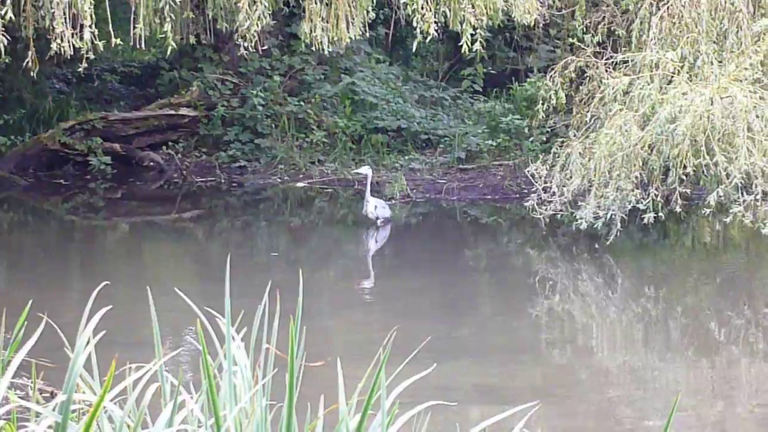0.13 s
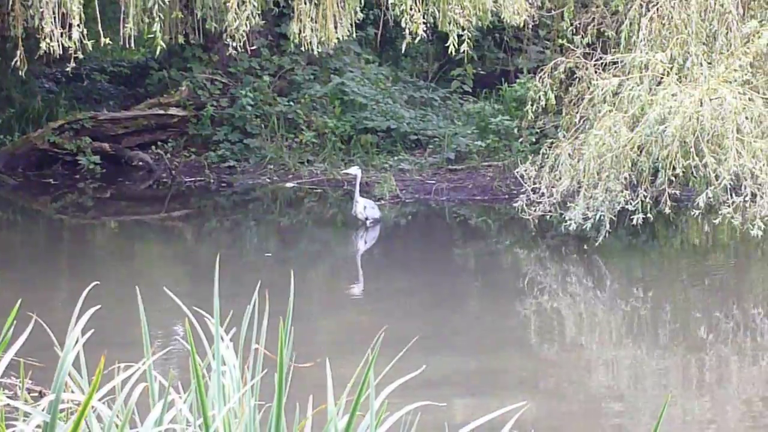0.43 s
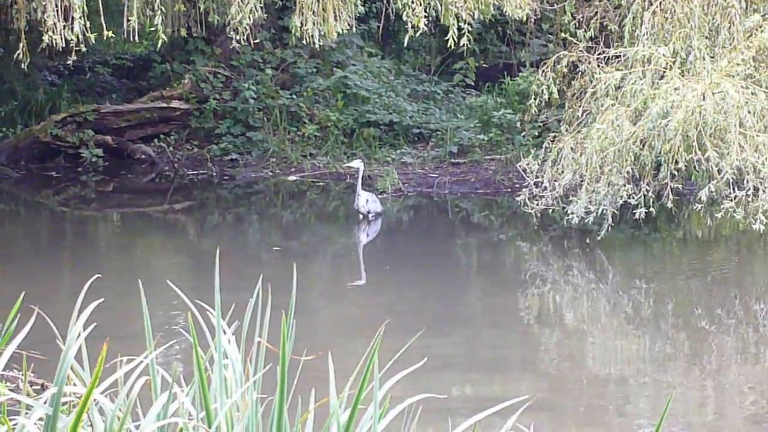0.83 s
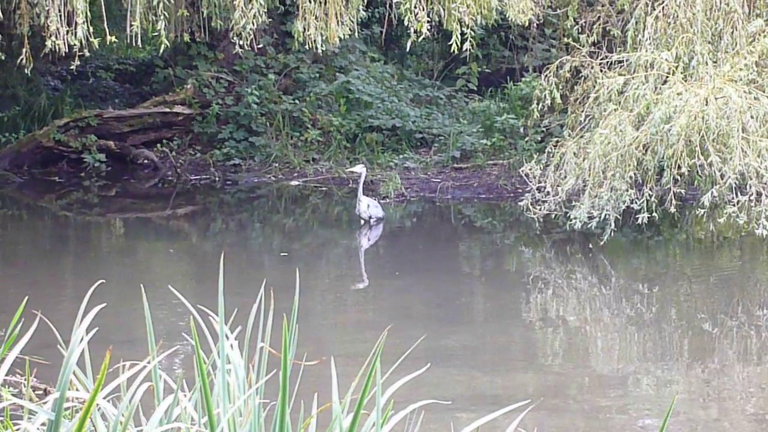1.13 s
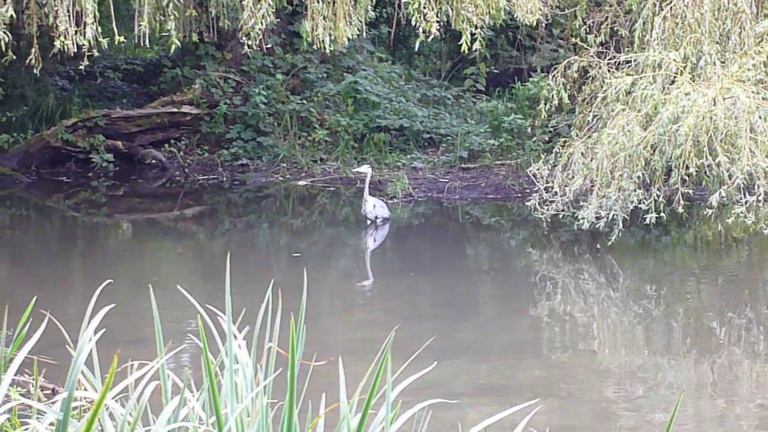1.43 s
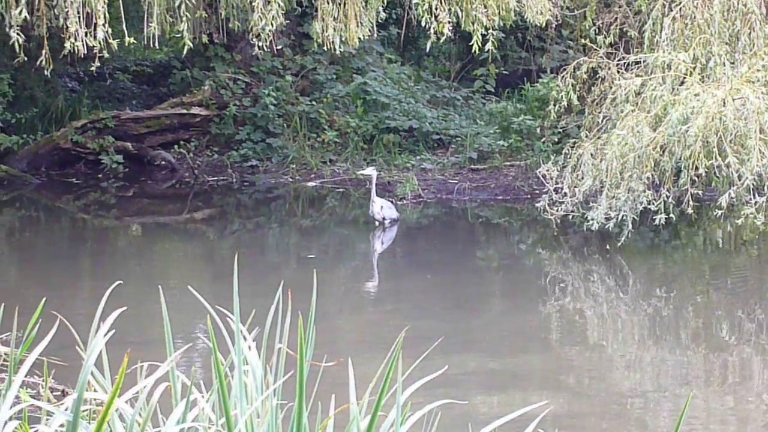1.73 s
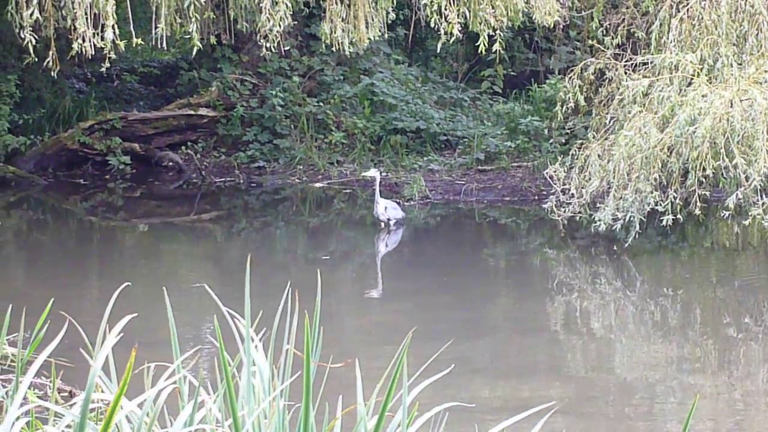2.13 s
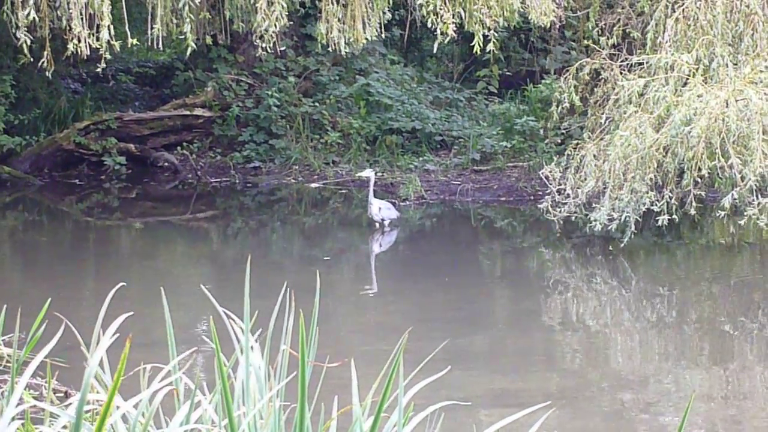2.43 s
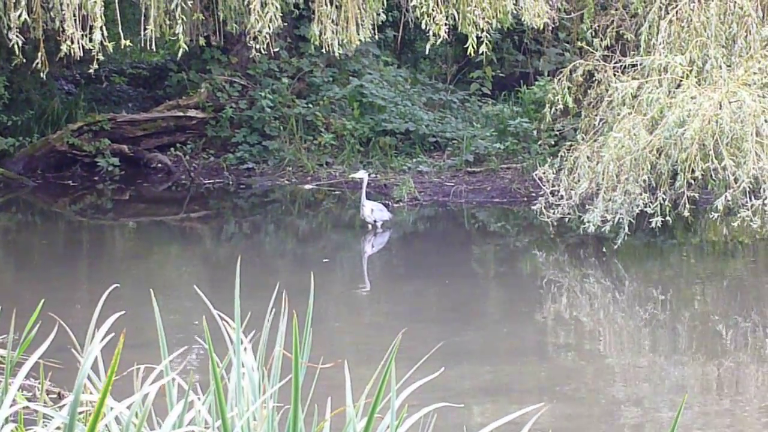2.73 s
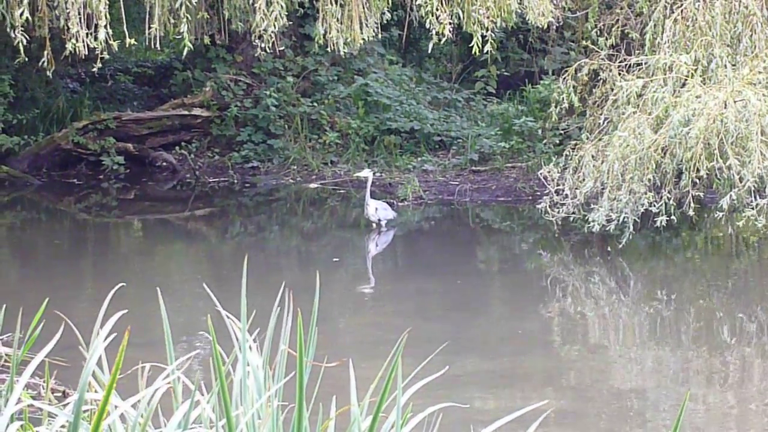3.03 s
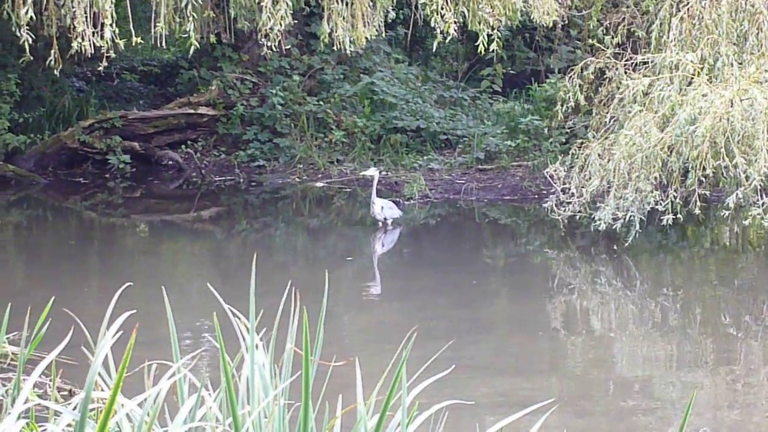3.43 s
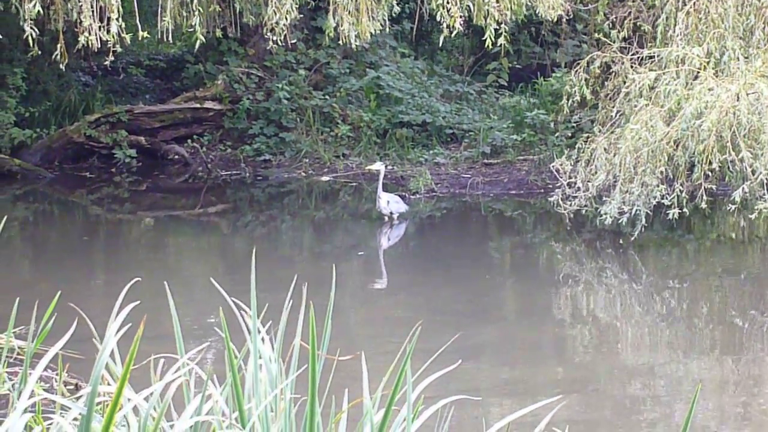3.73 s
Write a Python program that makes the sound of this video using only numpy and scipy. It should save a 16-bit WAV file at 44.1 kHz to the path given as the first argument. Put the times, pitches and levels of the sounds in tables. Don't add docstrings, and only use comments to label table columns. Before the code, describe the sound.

A small dog far off gives six short, high yaps, two close together, then spaced irregularly, echoing off bank and trees. Distant traffic and leaves murmur steadily; the camera is softly knocked before the last yaps.

```python
import sys
import numpy as np
from scipy import signal
from scipy.fft import rfft, irfft, next_fast_len
from scipy.io import wavfile
from scipy.ndimage import uniform_filter1d

SR = 44100
rng = np.random.default_rng(int(sys.argv[2]) if len(sys.argv) > 2 else 0)


def magnitude_from_level(level_db):
    exponent = np.asarray(level_db, float) / 20
    return 10 ** exponent


def generate_wav(signal):
    frames = np.transpose(np.atleast_2d(signal))
    scaled = np.clip(frames, -1, 1) * 32767
    pcm = np.round(scaled).astype(np.int16)
    wavfile.write(sys.argv[1], SR, pcm)


N = 171549


def evened(x):
    return x / np.sqrt(np.mean(x ** 2) + 1e-20)


def smoothed(x, width):
    return uniform_filter1d(uniform_filter1d(x, width), width)


def read(points, hz):
    f, value = np.transpose(points)
    return np.interp(np.log(hz + 1), np.log(f + 1), value)


def coloured(x, points):
    size = next_fast_len(len(x) + 2048)
    gain = magnitude_from_level(read(points, np.fft.rfftfreq(size, 1 / SR)))
    return irfft(rfft(x, size) * gain, size)[:len(x)]


def add(mix, s, sound):
    part = mix[round(s * SR):][:len(sound)]
    part += sound[:len(part)]


def traffic_and_leaves():
    # (time [s], level [dB])
    traffic = [(0.0, -49.5), (0.12, -46.5), (0.9, -43.5), (1.31, -45), (1.61, -44.5), (2.76, -44.5),
               (3.89, -47.5)]
    # (time [s], level [dB])
    breeze = [(0.0, -56.5), (0.33, -56.5), (1.35, -57), (2.119, -57), (3.23, -55), (3.6, -56.5),
              (3.89, -55.5)]
    # (frequency [Hz], level [dB per Hz])
    floor_colour = [(80, -13.5), (140, -1), (380, -3), (500, -8), (950, -6), (1650, -11.5), (3600, -23.5),
                    (7900, -33)]
    level_db, patch_db, split_hz = -39.5, 1.32, 750
    hop = 256
    frames = N // hop + 5
    hz = np.fft.rfftfreq(1024, 1 / SR)[:, None]
    real, imaginary, patches = rng.standard_normal((frames, 513, 3)).T
    patches = evened(uniform_filter1d(uniform_filter1d(patches, 10, 0), 14, 1))
    t = np.arange(frames) * hop / SR
    low_db = np.interp(t, *np.transpose(traffic))
    high_db = np.interp(t, *np.transpose(breeze))
    low_share = 1 / (1 + (hz / split_hz) ** 2)
    drift_db = low_share * (low_db - low_db.mean()) + (1.5 - low_share) * (high_db - high_db.mean())
    spectra = (real + 1j * imaginary) * magnitude_from_level(patch_db * patches + drift_db)
    noise = signal.istft(spectra, nperseg=1024, noverlap=768)[1][:N]
    return magnitude_from_level(level_db) * evened(coloured(noise, [(15, -36.5), *floor_colour]))


def knocks():
    # (time [s], level [dB], frequency [Hz], t60 [s])
    bumps = [
        (2.661, -44, 60, 0.19),
        (2.862, -27, 91.5, 0.051),
    ]
    attack_s = 0.0062
    out, t = np.zeros(N), np.arange(SR // 5) / SR
    for s, db, hz, t60_s in bumps:
        decay = magnitude_from_level(db - 60 * t / t60_s)
        add(out, s, decay * np.sin(2 * np.pi * hz * t) * np.minimum(t / attack_s, 1))
    return out


def bird():
    # (time [s], frequency [Hz], level [dB])
    whistle = [(3.29, 7600, -78), (3.35, 7770, -68), (3.4, 7900, -72), (3.46, 7970, -64), (3.5, 7950, -66),
               (3.6, 7890, -61), (3.66, 7830, -61), (3.72, 7760, -61), (3.77, 7640, -63), (3.85, 7700, -74)]
    tremble_db, tremble_hz = 5, 25
    s, hz, db = np.transpose(whistle)
    t = np.arange(N) / SR
    tremble = evened(smoothed_once(rng.standard_normal(N)))
    level = magnitude_from_level(np.interp(t, s, db, -140, -140) + tremble_db * tremble)
    turns = np.cumsum(np.interp(t, s, hz) + tremble_hz * tremble) / SR
    return np.sqrt(2) * level * np.sin(2 * np.pi * turns)


def smoothed_once(x):
    return uniform_filter1d(x, 500)


def yap(rows, noise, bright_db=0, pitch=1):
    # (frequency [Hz], level [dB])
    throat = [(420, -29.5), (640, -14), (880, 4.5), (1300, -3), (1530, -24), (1800, -23), (2400, -20.5),
              (3300, -53)]
    jitter, puff_share, breath = 0.02, 0.38, 0.55
    flip_hz, low_first_db, low_over_db = 740, -6, -5
    flutter_hz, flutter, scatter_db = 171.4, 0.61, 3.5
    rows = np.array(rows)
    start_s, end_s = rows[0, 0], rows[-1, 0]
    t = start_s + np.arange(round((end_s - start_s) * SR)) / SR
    effort_db, hz, half, rough = (np.interp(t, rows[:, 0], rows[:, k]) for k in (1, 2, 3, 4))
    half, rough, hz = np.clip(half, 0, 1), np.clip(rough, 0, 1), hz * pitch
    wander = evened(smoothed(noise[0], 150))[:len(t)]
    turns = np.cumsum(hz * (1 + jitter * wander)) / SR

    k = np.arange(1, 19)[:, None] / 2
    size = magnitude_from_level(read(throat, k * hz)) * np.where(k % 1, half, 1)
    low = np.clip((flip_hz - hz) / 60, 0, 1)
    over_db = (k > 1.6) * (k * hz > 1450) * (bright_db + low_over_db * low)
    size = size * magnitude_from_level(over_db + (k == 1) * low_first_db * low)
    waver = evened(smoothed(noise[2:], 200))[:, :len(t)]
    size = size * magnitude_from_level(scatter_db * np.minimum(k - .5, 2) / 2 * waver)
    folds = (size * np.cos(2 * np.pi * k * turns)).sum(0) / np.sqrt((size ** 2).sum(0) / 2)
    beat_turns = np.cumsum(flutter_hz * (1 + .3 * waver[0])) / SR
    folds = folds * (1 + flutter * rough * np.sin(2 * np.pi * beat_turns))

    gate = puff_share + np.exp(-3 * (turns % 1))
    puffs = coloured(gate * noise[1, :len(t)], throat)
    ends = np.clip(np.minimum(t - t[0], t[-1] - t) / 0.003, 0, 1)
    return ends * magnitude_from_level(effort_db) * (folds + breath * rough * evened(puffs))


def slaps():
    # (time [s], effort [dB], pitch [Hz], half-pitch share [0-1], roughness [0-1])
    slap_1 = [(.357, -42.5, 800, 0.22, .4), (.37, -34, 830, .2, .4), (.388, -43, 800, 0.5, .4)]
    slap_2 = [(.556, -40, 814, .1, .1), (.564, -34, 780, 0.11, .1), (.575, -40.5, 785, .1, .1),
              (.6, -36.5, 770, .1, .2)]
    slap_3 = [(.69, -41, 855, 0.35, 0.27), (0.699, -34.5, 851, 0.34, 0.25), (.715, -36.5, 810, 0.4, 0.47),
              (.735, -33.5, 824, .1, 0.45), (0.749, -41.5, 790, 0.09, 0.3)]
    slap_4 = [(.79, -43, 830, .1, 0.27), (.808, -34.5, 840, .1, .3), (0.815, -42, 840, .1, .3)]
    slap_5 = [(3.46, -36, 906, .7, .3), (3.48, -39, 871, 1, 0.28), (3.503, -34, 870, 1, .3),
              (3.525, -47, 870, 1, .3)]
    slap_bright_db = [4, 17.5, -2, -1, 0]
    out, tracks = np.zeros(N), (slap_1, slap_2, slap_3, slap_4, slap_5)
    noise = rng.standard_normal((len(tracks), 20, SR // 4))
    for rows, bright_db, chance in zip(tracks, slap_bright_db, noise):
        add(out, rows[0][0], yap(rows, chance, bright_db))
    return out


def whimper():
    # (time [s], length [s], level [dB], start pitch [Hz], end pitch [Hz])
    soft_note = (3, 0.16, -36, 616, 660)
    out = np.zeros(N)
    s, length_s, db, from_hz, to_hz = soft_note
    u = np.linspace(0, 1, round(length_s * SR))
    turns = np.cumsum(from_hz + (to_hz - from_hz) * u) / SR
    add(out, s, magnitude_from_level(db) * np.sin(np.pi * u) * np.sin(2 * np.pi * turns))
    return out


def rasp(length_s, db, top, mouth, noise):
    # (frequency [Hz], width [Hz], level [dB])
    mouth_peaks = [(2270, 440, 8), (3150, 500, -10.5)]
    # (frequency [Hz], width [Hz], level [dB])
    top_peaks = [(4490, 420, -12), (6810, 500, -13.5)]
    hz = np.fft.rfftfreq(len(noise), 1 / SR)
    peaks = [(f * mouth, w, magnitude_from_level(d)) for f, w, d in mouth_peaks]
    peaks += [(f * np.sqrt(mouth), w, top * magnitude_from_level(d)) for f, w, d in top_peaks]
    colour = sum(g / (1 + (2 * (hz - f) / w) ** 2) for f, w, g in peaks)
    u = np.linspace(0, 1, round(length_s * SR))
    air = evened(irfft(rfft(noise) * colour))[:len(u)]
    return magnitude_from_level(db) * np.sin(np.pi * u ** 0.5) * air


def woods(x):
    # (delay [s], level [dB])
    echoes = [(.009, -16.5), (0.022, -11.5), (.085, -20.5), (.135, -27)]
    # (frequency [Hz], t60 [s])
    decay_s = [(600, 3.1), (800, 1.66), (1000, 0.63), (1500, 1.5), (2500, 2.4), (5000, 1.2)]
    tail_db, start_s, spacing = -14, 0.05, 22
    clump_db = 3.5
    taps = np.zeros(SR)
    at = np.arange(round(start_s * SR), SR - 30, spacing)
    chance = rng.random((SR // spacing, 2))[:len(at)]
    taps[at + (chance[:, 0] * spacing).astype(int)] = np.sign(chance[:, 1] - .5)
    taps = taps * magnitude_from_level(clump_db * evened(smoothed(rng.standard_normal(SR), 500)))
    hz, t, z = signal.stft(taps, SR, nperseg=256)
    tail = signal.istft(z * magnitude_from_level(-60 * t / read(decay_s, hz)[:, None]), SR, nperseg=256)[1]
    tail = magnitude_from_level(tail_db) * tail / np.linalg.norm(tail)
    tail[0] += 1
    for s, db in echoes:
        tail[round(s * SR)] += magnitude_from_level(db)
    return signal.fftconvolve(x, tail)[:len(x)]


def dog():
    # (time [s], effort [dB], pitch [Hz], half-pitch share [0-1], roughness [0-1])
    yap_1 = [(.142, -27.5, 567, .3, 0), (.157, -17.5, 602, .1, 0.04), (.165, -32.5, 638, .2, 0.33),
             (.17, -25, 780, .5, 0.11), (.185, -19, 820, 0.7, 0.4), (.205, -22, 899, 0, 0.3),
             (.227, -18, 877, .1, 0.08), (.245, -30, 794, .2, 0.2), (.258, -28, 784, .2, 0.31)]
    yap_2 = [(.452, -30, 451.3, 0.21, 0.31), (.474, -24.5, 619.5, 0.65, 0.95), (.487, -30, 614, 0.63, 0.33),
             (.493, -24, 940, 0.44, 0.63), (0.509, -16, 814, 0.096, 0.31), (.53, -17.5, 915.5, .05, .08),
             (0.549, -17, 872, 0.04, 0.086), (.556, -39, 825, 0.14, 0.16), (0.569, -25.5, 805, 0.039, 0.13)]
    yap_3 = [(1.085, -52, 603, 0.035, 0.048), (1.098, -30, 614, .05, 0.16), (1.116, -18, 623, .05, 0.064),
             (1.12, -29.5, 640, 0.055, .3), (1.124, -24, 793.5, .05, 0.7),
             (1.142, -16.5, 809.7, 0.043, 0.21), (1.149, -17.5, 893.4, .05, 0.2),
             (1.18, -15.5, 961, .05, 0.35), (1.216, -35, 1030, .05, 0.24)]
    yap_4 = [(1.638, -43, 623.6, .05, .1), (1.659, -25, 670.6, .05, .1), (1.671, -24.5, 699.5, .1, .2),
             (1.674, -25.5, 815, 0.085, .2), (1.686, -18.5, 825, .1, 0.35), (1.692, -19, 937, .4, 0.86),
             (1.71, -16, 922.7, .1, 0.18), (1.741, -24, 909, 0.17, 1), (1.778, -35, 890, .2, 0.41)]
    yap_5 = [(3.33, -42, 539, .3, .4), (3.343, -15.5, 508.5, 0.73, 0.46), (3.356, -24, 656, 0.18, 0.2),
             (3.36, -15, 865.2, 0.92, 0.26), (3.386, -21.5, 899.4, 0.73, 0.65),
             (3.404, -17.5, 799, 0.32, 0.25), (3.407, -20.5, 1066, .1, .25), (3.431, -21, 1032, .05, .1),
             (3.438, -41, 1060, 0.046, .1)]
    yap_6 = [(3.804, -46, 560, .5, .2), (3.815, -27, 578.3, 0.5, .15), (3.823, -26.5, 589.4, .1, .1),
             (3.833, -23.5, 594, .05, .1), (3.841, -18, 671, 0.76, 0.69), (3.847, -21.5, 863, 0.72, 0.49),
             (3.873, -16.5, 905.6, 0.43, 0.57), (3.897, -19.5, 902, 0.36, .3)]
    whine_1 = [(.258, -35, 766, 0.28, .15), (0.274, -21.5, 755, 0.32, 0.26), (.288, -32, 754, 0.19, .3),
               (.298, -25, 758, 0.22, .3), (.308, -33, 762, .3, .3), (.32, -32, 767, 0.36, .3),
               (0.336, -40, 780, 0.5, 0.34)]
    whine_2 = [(.58, -42.5, 804.5, 0.11, .15), (.597, -33.5, 785, .5, .2), (0.603, -23, 772, 0.44, 0.16),
               (.62, -37, 751, 0.38, 0.25), (0.639, -25, 770, .15, 0.3), (.652, -32.5, 804, 0.16, .4)]
    voice_bright_db = [4, 1.5, -0.5, 0, -3, 3, -5.5, -5.5]
    # (time [s], length [s], level [dB], share of top resonances, mouth scale)
    rasps = [
        (0.147, 0.18, -43.5, .2, 1.01),
        (0.464, 0.074, -38.5, 0.1, 1.05),
        (1.109, 0.071, -37, 0.22, 1.023),
        (1.673, 0.067, -36, 1.16, .96),
        (3.346, 0.025, -36, 0.0202, 0.92),
        (3.819, 0.085, -41, 1, 1.01),
        (3.348, .026, -43, .02, 1.426),
    ]
    earlier_s, earlier_db, earlier_pitch = -0.11, -0.5, 0.97
    lead = SR // 4
    lead_s = lead / SR
    voices = (yap_1, yap_2, yap_3, yap_4, yap_5, yap_6, whine_1, whine_2)
    out = np.zeros(N + lead)
    noise = rng.standard_normal((len(voices) + 1, 20, SR // 4))
    for rows, chance, bright_db in zip(voices, noise, voice_bright_db):
        add(out, rows[0][0] + lead_s, yap(rows, chance, bright_db))
    for (s, *row), chance in zip(rasps, noise[:, -1, -8192:]):
        add(out, s + lead_s, rasp(*row, chance))
    add(out, earlier_s + lead_s, magnitude_from_level(earlier_db) * yap(yap_5, noise[-1], pitch=earlier_pitch))
    return woods(out)[lead:]


def scene():
    return (traffic_and_leaves() + knocks() + bird() + slaps() + whimper() + dog())[None]


def roll_off(x):
    return signal.sosfilt(signal.butter(12, 8780, fs=SR, output="sos"), x)


def record(dry):
    # (frequency [Hz], level [dB])
    band_edge = [(7000, -1), (7600, -4.5), (7950, -16), (8050, -22.5), (8300, -15), (8700, -23.5),
                 (9000, -42.5), (9300, -89)]
    first_rate_hz, offset = 16000, -0.036
    half_hz = first_rate_hz / 2
    x = coloured(dry[0], [(half_hz - 20, 0), (half_hz, -100)])
    x = x + 2 * x * np.cos(2 * np.pi * first_rate_hz * np.arange(N) / SR)
    mix = (coloured(x, band_edge) + offset)[None]
    return roll_off(mix)


dry = scene()
out = record(dry)
generate_wav(out)
```